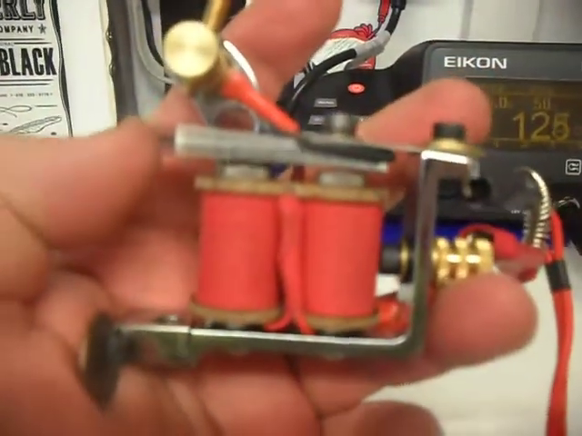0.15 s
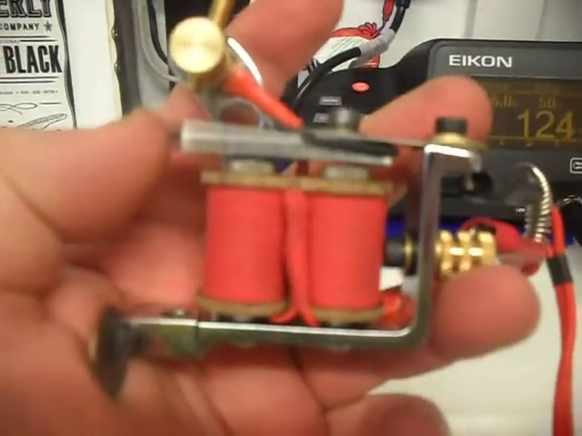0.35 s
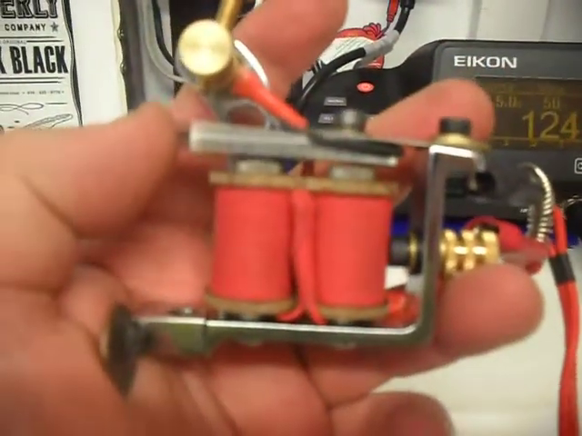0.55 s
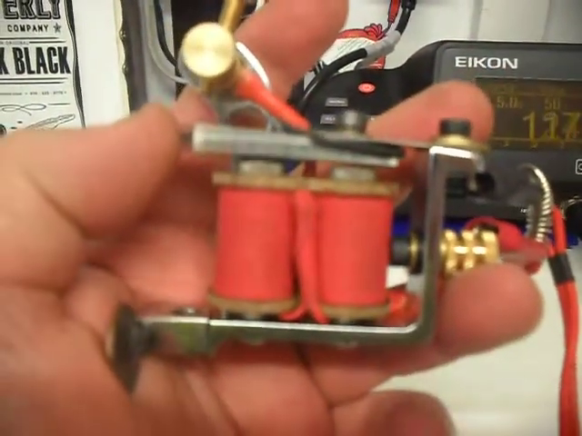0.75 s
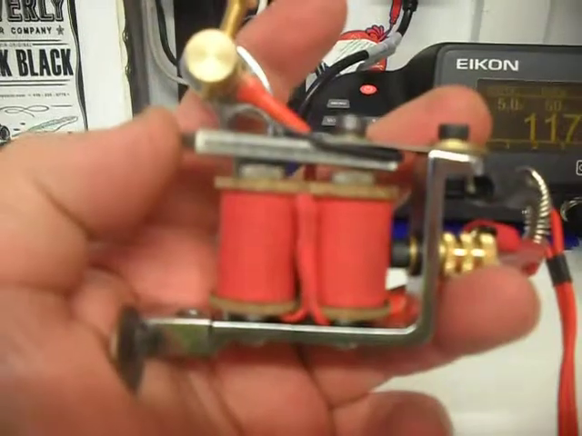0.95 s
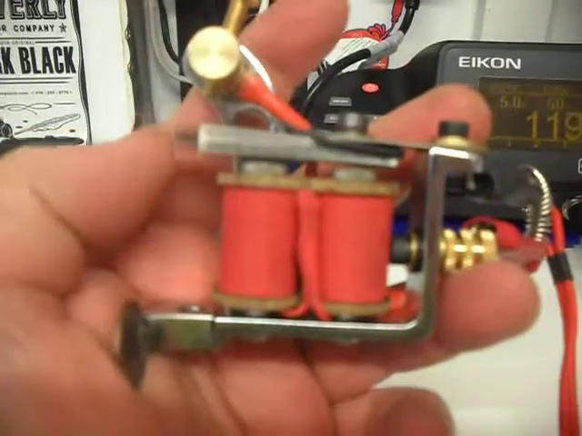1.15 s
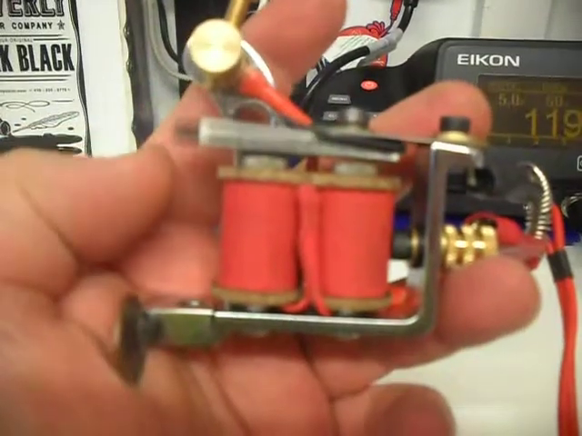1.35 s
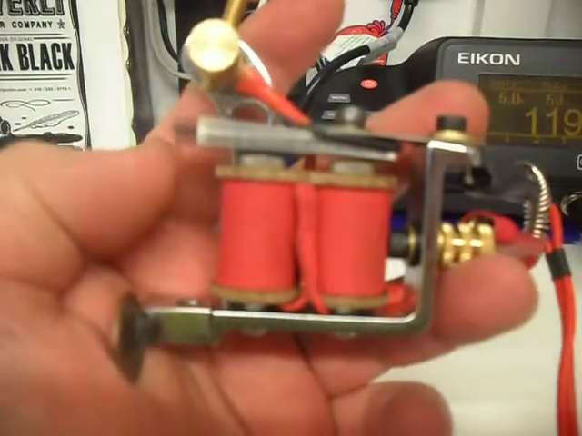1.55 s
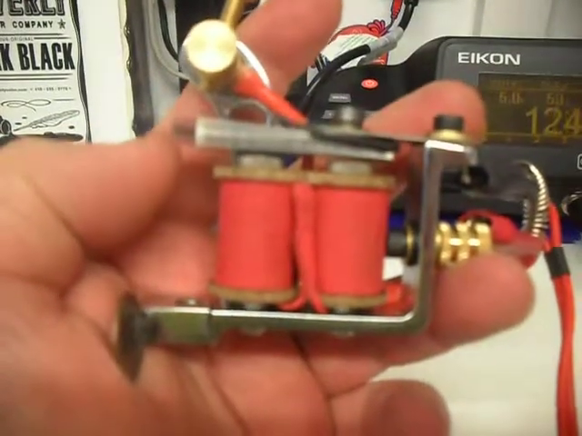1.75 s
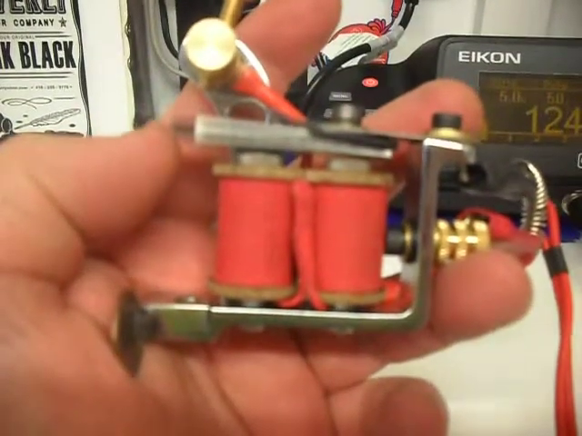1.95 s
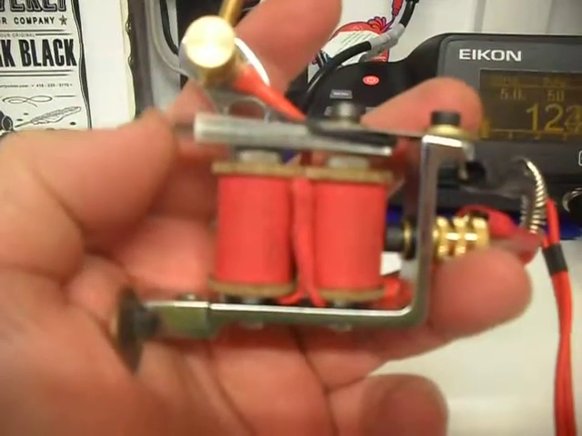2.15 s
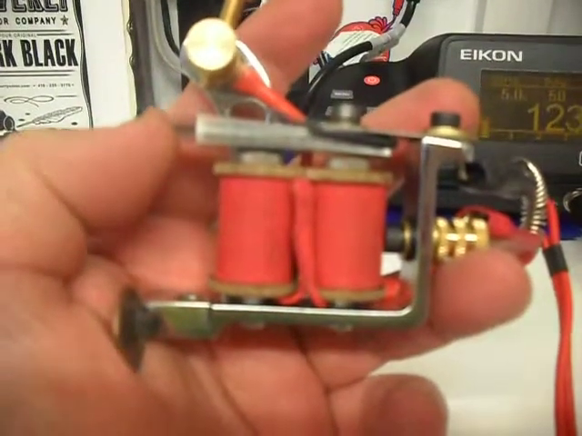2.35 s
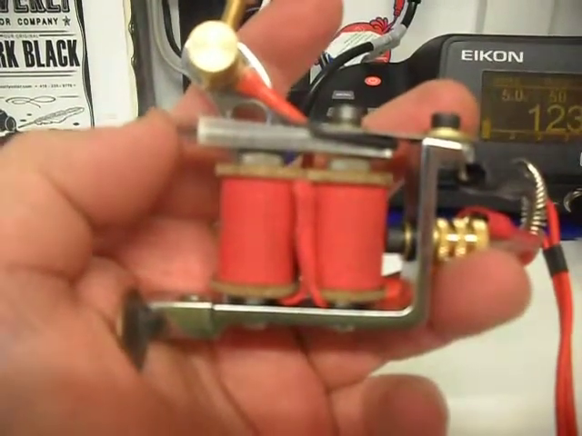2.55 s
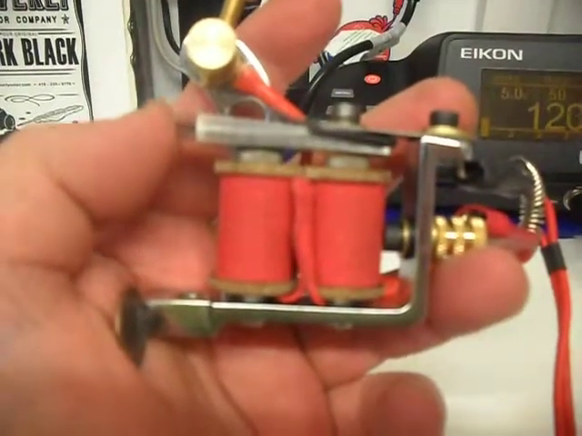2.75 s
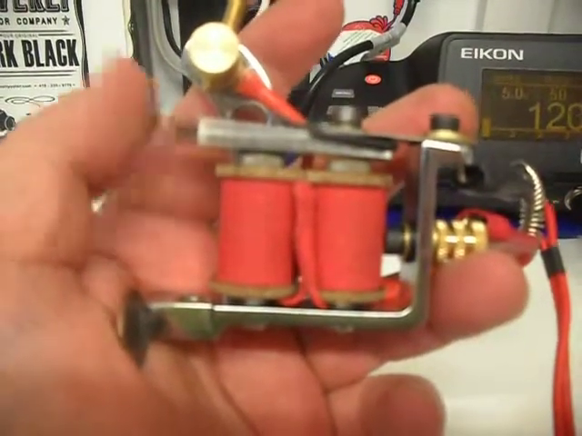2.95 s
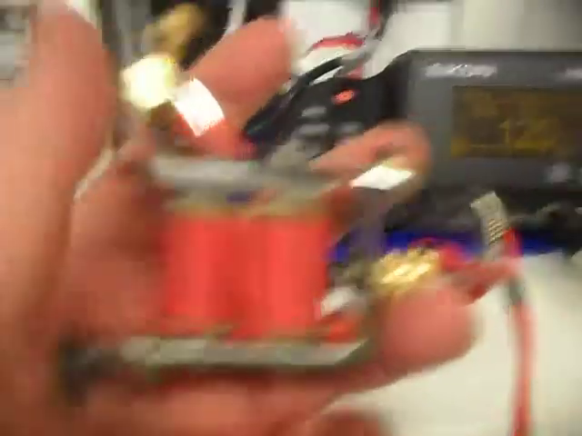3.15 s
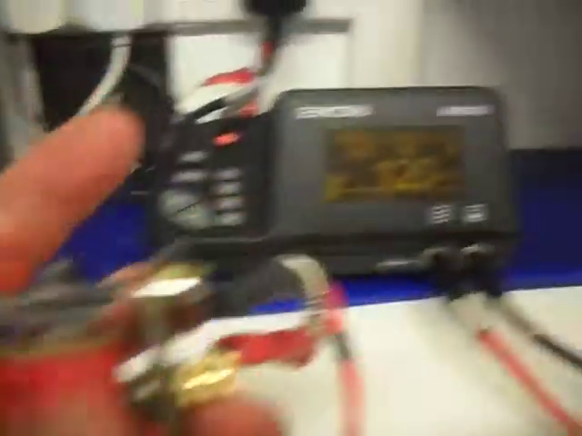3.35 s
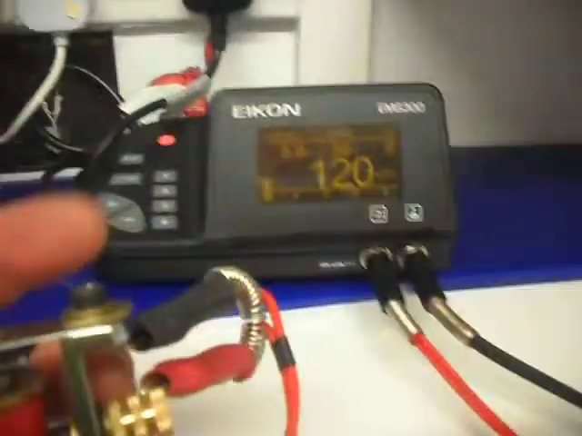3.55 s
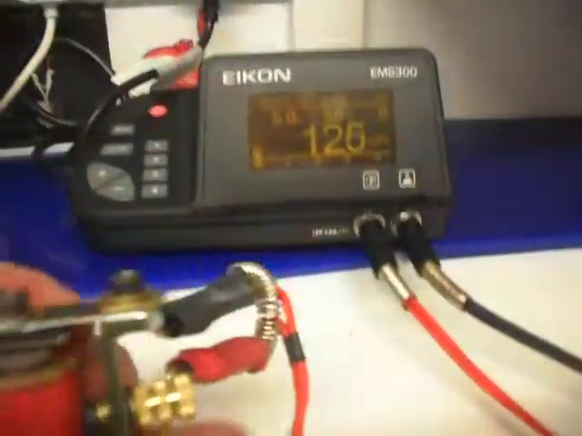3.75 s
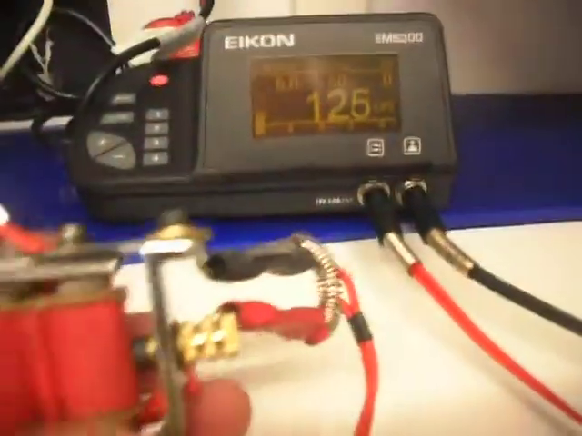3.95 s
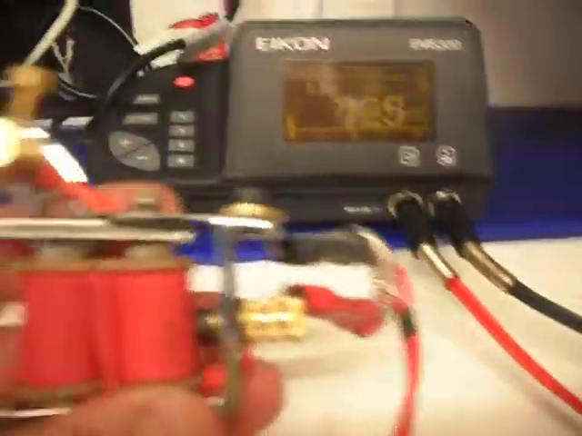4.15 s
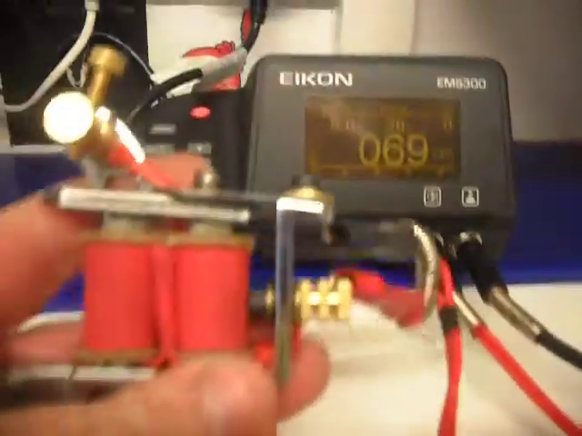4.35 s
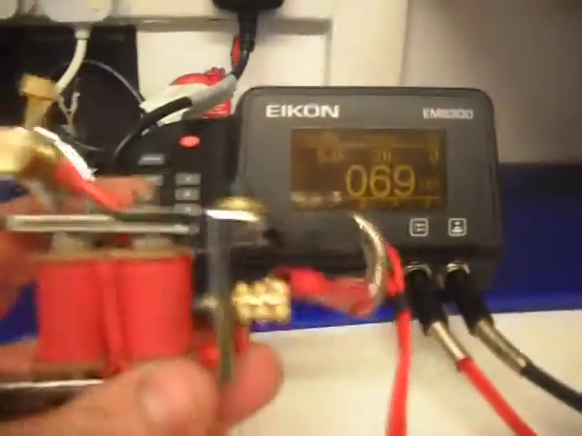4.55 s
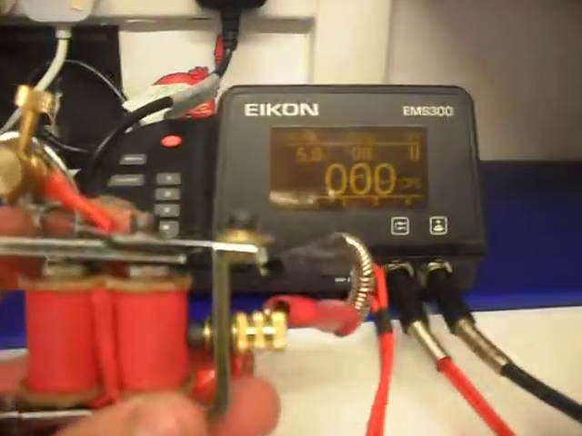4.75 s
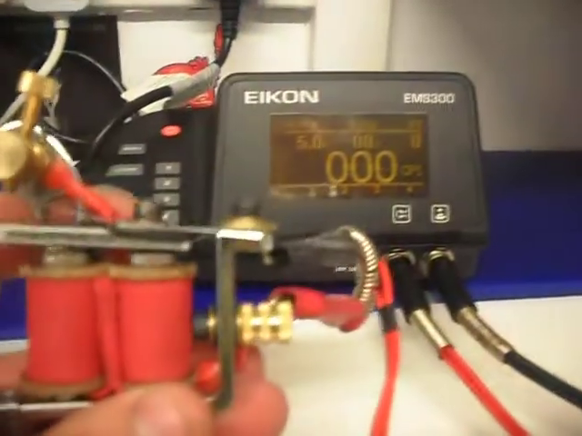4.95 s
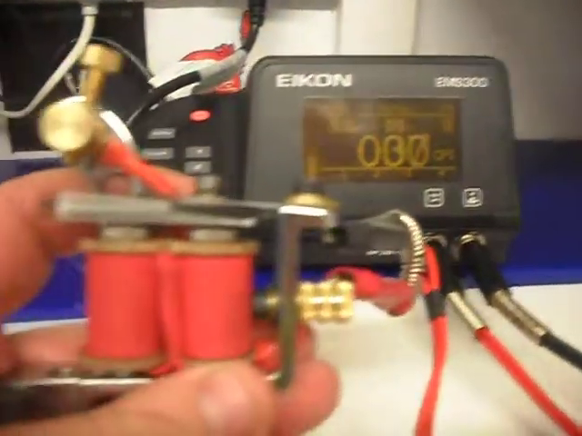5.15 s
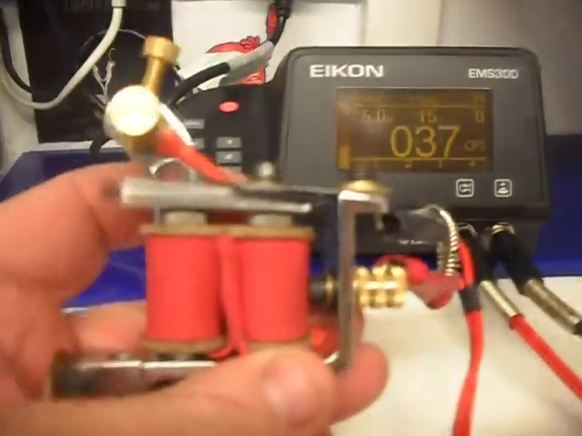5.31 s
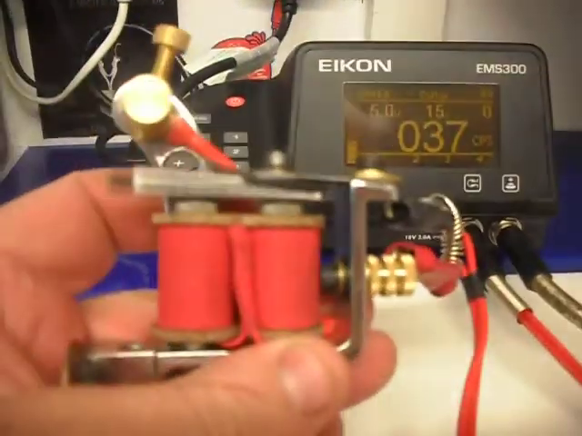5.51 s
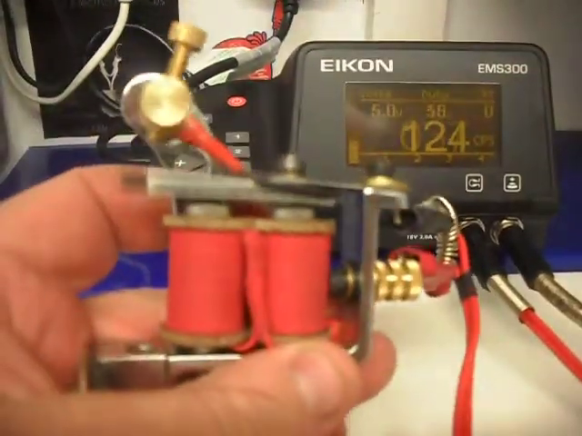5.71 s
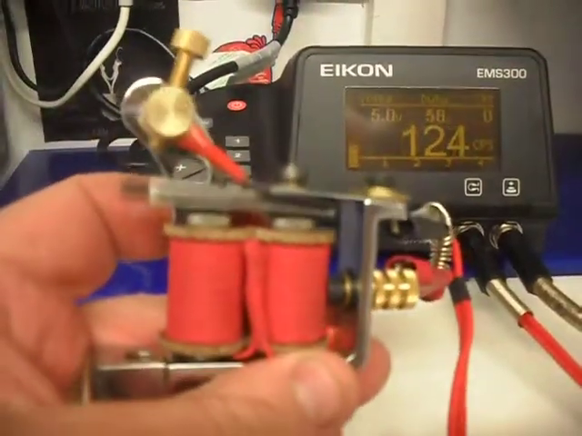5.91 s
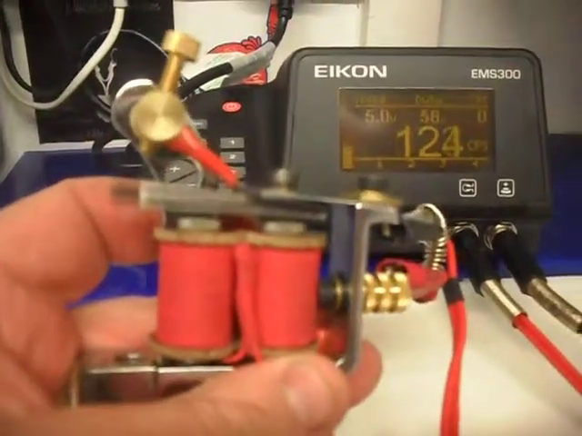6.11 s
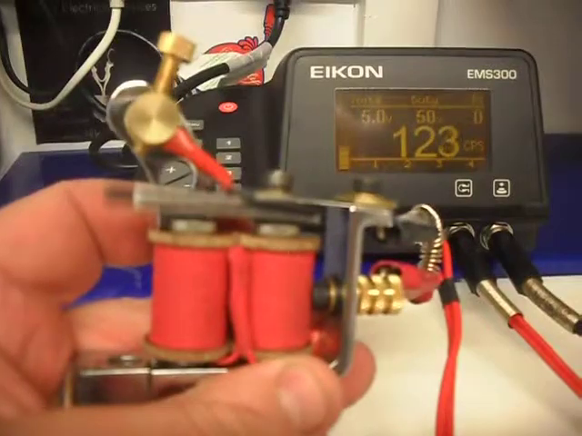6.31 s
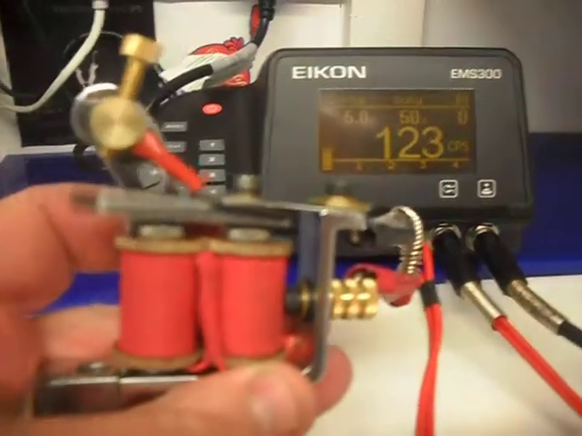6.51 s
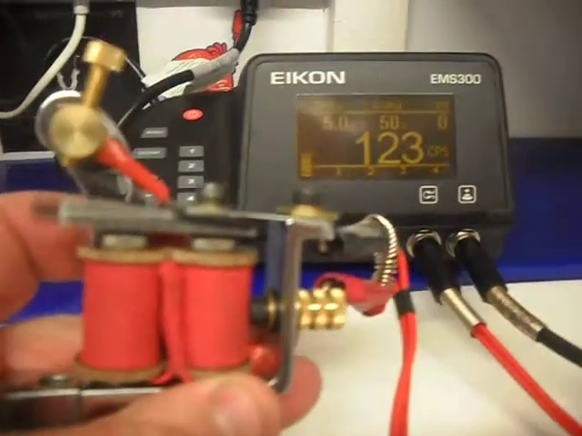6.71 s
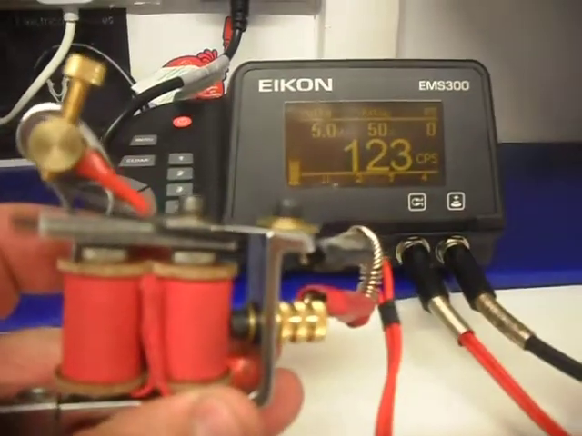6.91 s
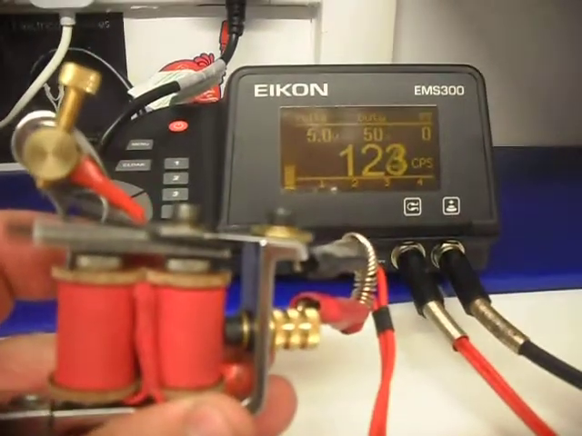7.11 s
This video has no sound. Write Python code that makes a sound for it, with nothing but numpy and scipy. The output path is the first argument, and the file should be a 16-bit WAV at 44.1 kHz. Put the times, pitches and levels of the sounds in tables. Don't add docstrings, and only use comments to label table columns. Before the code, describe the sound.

Close metallic buzzing from a tattoo-style coil machine, twice choked to faint contact ticking, silenced briefly amid dull handling knocks, then running again evenly.

```python
import sys
import numpy as np
from scipy import signal
from scipy.io import wavfile
from scipy.ndimage import uniform_filter1d

SR = 44100
rng = np.random.default_rng(int(sys.argv[2]) if len(sys.argv) > 2 else 0)


def ratio_of_db(decibels):
    return 10 ** (np.asarray(decibels, float) / 20)


def int16_out(signal):
    q = np.round(np.clip(np.atleast_2d(signal).T, -1, 1) * 32767)
    wavfile.write(sys.argv[1], SR, q.astype(np.int16))


N = 320607
T = np.arange(N) / SR

# time [s], position step,
# grip (0 fingers on the frame, 1 free, 2 seen from the top), nearness [dB].
POSE = [(0, 0.81, 0.44, 0.84), (1.05, 1.2, 0.08, 0.7), (1.1, 1.06, 0.58, -1.5), (1.3, 1.34, 0.83, -1),
        (1.6, 0.84, 0.67, -1.6), (2, 1.63, 0.37, -0.26), (2.8, 2.96, 0.27, 0.05), (2.95, 2.27, 0.48, -0.6),
        (3.15, 2.13, 0.29, -2.5), (3.35, 3.5, 0.17, -2.5), (3.5, 7.1, 0.15, -1.7), (3.6, 5.7, 0.15, -0.3),
        (3.87, 8.95, 0.097, -1.5), (4.97, 8.6, 1.4, -2), (5.4, 6.17, 1.56, -3.5), (5.65, 6.26, 1.46, -2.5),
        (6.35, 4.52, 1.365, -0.5), (7.27, 3.82, 1.45, -3)]
# time [s], strokes per second [Hz].
PACE = [
    [(0, 123), (.44, 117.5), (.534, 113), (.576, 115.7), (.622, 113), (.898, 122.6), (1.0, 123),
     (1.07, 118.4), (1.1, 123.1)],
    [(1.19, 124.85), (1.564, 124.8), (1.74, 123.5), (2.02, 121.2), (2.13, 121.8), (2.3, 121.5),
     (2.516, 119.7), (2.602, 117.8), (2.7, 113.9)],
    [(2.754, 114.1), (2.788, 118.5), (2.89, 121.1), (2.936, 124.5), (3.35, 125.25), (3.46, 125.15),
     (3.62, 123.8), (3.744, 123.1), (3.86, 125.4)],
    [(4.994, 122.5), (5.02, 124.5), (5.24, 124.1), (5.45, 124.7), (5.54, 124), (6.14, 123.6), (6.86, 123.4),
     (7.27, 123.7)],
]
STRIKES = [1.1, 4.9965]
CURRENT_OFF = [3.863, 4.994]
# level for grip 0, 1, 2 [dB], loss under the free pace [dB/Hz],
# further loss when faltering [dB/Hz].
PARTS = dict(ring=(-38, -35.5, -36, 1.18, 1), thud=(-52, -53, -40, 0.83, 1.3),
         treble=(-41.5, -41.5, -30, 1.11, 1.5), contact=(-45.5, -41.5, -43, 0.79, 3.5))
# start [s], end [s].
MISSES = [
    (.505, .552),
    (.612, 1.093),
    (2.685, 2.768),
]
# time [s], half length [s], screw [dB], spring [dB].
FLUTTERS = [
    (0.528, 0.046, -57.5, -54.5),
    (0.629, 0.042, -58, -54),
    (0.793, 0.065, -57, -62),
    (1.06, 0.037, -59.5, -60),
    (2.734, 0.089, -58.5, -57),
]
# frequency [Hz], width [Hz], level for grip 0, 1, 2 [dB].
FRAME_MODES = [(3713, 87, -6, 10.5, -4), (3846, 60, -24, 2.5, -3), (4380, 50, -47, -24, -24),
               (4600, 19, -25, -18, -24), (4715, 40, -26, -12, 2), (4768.5, 66, 0.5, 10, -9),
               (5005, 60, -8.5, -1, 11), (5600, 55, -18, -28, -14), (5406, 75, -5, 3, -15),
               (5720, 49, -15, -22, -27)]
# frequency [Hz], width [Hz], level for grip 0, 1, 2 [dB].
COIL_MODES = [(2320, 340, -13.5, -12.5, -16), (2530, 180, -17, -11.5, 9), (2979.5, 39.5, 3, 3, 2),
              (3070, 51, -5.5, -8, -11), (3400, 69, -17, 0, 13)]
# frequency [Hz], width [Hz], level from the side, from the top [dB].
BAR_MODES = [(5930, 380, -8, -24), (6590, 295, -2, 12), (6940, 210, -36, 18.5), (6640, 560, -33, -32.5),
             (7760, 220, -30, 21), (7920, 1130, -6, 6.5), (8900, 460, -28, -16.5), (9060, 123, 2, 14),
             (8800, 130, -10, -2), (9800, 120, -12, 0), (10670, 140, -7, -11), (9676, 120, -1.5, -6),
             (10120, 124, -1.5, -12), (11390, 47, -6.5, -18)]
# frequency [Hz], level from the side, from the top [dB].
THUD = [(200, -30, -67), (405, -35.5, -34.5), (503.5, 3.5, 14.5), (816, -7, -2.5), (882, 11.5, 17.5),
        (1220, 9.5, 1.5), (1555, 8, 21), (1834, 12, -3.5), (1930, 1.5, 17), (2324, 12, -32),
        (2835, -28.5, -34), (4000, -67.5, -62)]
# frequency [Hz], width [Hz], level [dB].
SPRING_MODES = [(2500, 380, -19.5), (2974, 60, -4.5), (3240, 70, -0.5), (3410, 164, -3.5)]
# frequency [Hz], width [Hz], level [dB].
SCREW_MODES = [(7620, 200, 0), (7850, 150, 0), (8300, 150, -1), (9200, 300, -5), (9690, 250, 0),
               (10300, 260, -3), (10650, 160, -1), (11400, 160, -6)]
# frequency [Hz], level [dB].
SNAP = [(600, -30), (1500, -10), (3800, -3), (5500, -2), (6300, -7), (6900, -20), (7600, -6), (10500, -4),
        (11600, -8), (13000, -20)]
# start [s], end [s], first order, third order [dB].
SQUEEZES = [(0.312, 0.785, -73, -72.5), (0.803, 1.147, -74.5, -103), (1.933, 2.066, -74, -99),
            (2.557, 2.85, -74, -74), (3.138, 3.38, -70, -71.5), (3.54, 3.88, -81, -81),
            (5.027, 5.16, -73, -74), (5.65, 7.3, -69, -97.5)]
# frequency [Hz], density [dB per Hz].
FLOOR = [(8.8, -33), (15, 4), (46, -9.5), (120, -22), (154, -17.5), (178, -22.5), (312, -23), (489, -26),
         (788, -27), (1140, -28), (1940, -31.5), (2290, -32.5), (9880, -37), (12400, -63), (16100, -99),
         (22000, -120)]
# frequency [Hz], width [Hz], level [dB].
ROOM_HUM = [(101.6, 1.5, -76), (146.3, 5.5, -82.5)]
# start [s], end [s], level [dB], low edge [Hz], high edge [Hz].
RUBS = [(3.164, 3.302, -58.5, 650, 1500), (3.174, 3.35, -80, 200, 650), (3.852, 3.915, -55, 1780, 4140),
        (4.187, 4.263, -72, 500, 1400), (4.75, 4.82, -74, 700, 2500), (4.941, 4.998, -62, 900, 3840),
        (4.762, 4.778, -69, 1500, 4000)]
# time [s], peak [dB], frequency [Hz], t60 [s].
KNOCKS = [(3.186, -45.5, 1110, 0.085), (3.201, -44, 284, 0.051), (3.224, -53, 1156, 0.098),
          (3.25, -64, 965, 0.07), (3.286, -57, 780, 0.31), (3.9, -48.5, 245, 0.065),
          (4.197, -47.5, 1030, 0.045), (4.202, -52, 313, 0.05), (4.245, -60, 247, 0.052),
          (4.495, -49, 233, 0.066), (4.5, -56, 605, 0.065), (4.755, -57, 910, 0.07), (4.775, -61, 1160, .1),
          (4.768, -63, 3350, .04), (4.947, -46.5, 1370, 0.045)]
# time [s], level [dB].
LOOSE_TICKS = [(3.874, -55), (3.88, -51), (3.89, -53), (3.9, -52), (3.916, -59), (3.925, -60),
               (4.9635, -61), (4.9728, -54), (4.981, -56), (4.99, -53)]
# frequency [Hz], t60 [s].
ROOM = [(500, 0.3), (2000, 0.32), (5000, 0.28), (11000, 0.029)]

FREE_HZ, FALTER_HZ = 123.16, 118.6
MISS_EDGE_S, MISS_DB = 0.011, -50
HELD_THUD_DB = -12.5
REST_SCREW_DB, REST_SPRING_DB = -65, -64
CONTACT_TOP_DB, SCREW_TOP_DB = -52, -54
FRAME_LAG_S = 0.0005
BOUNCE_S, BOUNCE_DB, BOUNCE_SHIFT = 0.00155, -6, 0.008
SQUEEZE_EDGE_S, LOOSE_HUM_DB, LOOSE_THIRD_DB = 0.11, -73, -81.5
FLOOR_DB = -60.5


def evened(x):
    return x / np.sqrt(np.mean(x ** 2) + 1e-20)


def read(points, hz):
    f, value = np.transpose(points)
    return np.interp(np.log(hz + 1), np.log(f + 1), value)


def column(tables, index):
    rows = np.vstack(tables)
    return np.interp(T, rows[:, 0], rows[:, index])


def span(t, start, end, edge_s):
    return np.clip(np.minimum(t - start, end - t) / edge_s + 0.5, 0, 1)


def over(db, top_db):
    under = ratio_of_db(np.minimum(db, top_db))
    return under, np.sqrt(ratio_of_db(db) ** 2 - under ** 2)


def unit(response):
    return response / np.linalg.norm(response) * np.sqrt(SR / 124)


def struck(gain):
    log_gain = np.log(gain / gain.max() + 1e-5)
    response = np.fft.ifft(np.exp(np.conj(signal.hilbert(log_gain)))).real
    return unit(response[:len(gain) // 2])


def ring(modes, size=8192):
    f = abs(np.fft.fftfreq(size, 1 / SR)) + 1
    power = sum(ratio_of_db(2 * db) / (1 + (2 * (f - hz) / width) ** 2) for hz, width, db in modes)
    low_skirt = 1 + (0.93 * modes[0][0] / f) ** 16
    high_skirt = 1 + (f / modes[-1][0] / 1.07) ** 16
    return struck(np.sqrt(power / (low_skirt * high_skirt)))


def click(points, size=8192):
    return struck(ratio_of_db(read(points, abs(np.fft.fftfreq(size, 1 / SR)))))


def impulses(s, size):
    at = (s * SR).astype(int)[:, None] + np.arange(-15, 17)
    off = at - s[:, None] * SR
    pulse = np.sinc(off) * np.cos(np.pi * off / 34) ** 2
    out = np.zeros(N + 64)
    np.add.at(out, np.clip(at, 0, N + 63), pulse * size[:, None])
    return out[:N]


def played(s, size, response):
    return signal.oaconvolve(impulses(s, size), response)[:N]


def powered(t):
    return (t < CURRENT_OFF[0]) | (t > CURRENT_OFF[1])


def bar_turns():
    turns = np.cumsum(column(PACE, index=1)) / SR
    shift = np.unwrap(-np.interp(STRIKES, T, turns) % 1, period=1)
    return turns + np.interp(T, CURRENT_OFF, shift)


def strengths(s):
    hz = np.interp(s, T, column(PACE, index=1))
    grip = np.interp(s, T, column([POSE], index=2))
    near_db = np.interp(s, T, column([POSE], index=3))
    missed_db = MISS_DB * sum(span(s, start, end, MISS_EDGE_S) for start, end in MISSES)
    slow_hz, falter_hz = FREE_HZ - hz, np.maximum(FALTER_HZ - hz, 0)
    ring_db, thud_db, treble_db, contact_db = (
        np.interp(grip, range(3), part[:3]) + near_db + missed_db - part[3] * slow_hz - part[4] * falter_hz
        for part in PARTS.values())
    screw, spring = ratio_of_db(REST_SCREW_DB), ratio_of_db(REST_SPRING_DB)
    for at, half, flutter_screw_db, flutter_spring_db in FLUTTERS:
        bump = np.exp(-((s - at) / half) ** 2)
        screw = screw + bump * ratio_of_db(flutter_screw_db)
        spring = spring + bump * ratio_of_db(flutter_spring_db)
    screw_db, spring_db = 20 * np.log10(screw), 20 * np.log10(spring)
    thud_db = np.maximum(thud_db, screw_db + HELD_THUD_DB)
    return ring_db, thud_db, np.maximum(treble_db, screw_db), np.maximum(contact_db, spring_db)


def core_blows(s, weak, frame, coil, tick, thud):
    blow_s = s + (1.5e-6 + 12e-6 * weak) * rng.standard_normal(len(s))
    blow = powered(s) * ratio_of_db((0.06 + 0.5 * weak) * rng.standard_normal(len(s)))
    grip = np.clip(np.interp(s, T, column([POSE], index=2)), 0, 2)
    bounce_s = BOUNCE_S * (1 + BOUNCE_SHIFT * np.interp(s, T, column([POSE], index=1)))
    taps = [(0, 0), (bounce_s, BOUNCE_DB), (2.37 * bounce_s, 2.7 * BOUNCE_DB)]
    out = 0
    for k in range(3):
        hit = blow * np.maximum(1 - abs(grip - k), 0)
        side = 1 + k // 2
        frame_ring = ring([(m[0], m[1], m[2 + k]) for m in FRAME_MODES])
        coil_ring = ring([(m[0], m[1], m[2 + k]) for m in COIL_MODES])
        bar_ring = ring([(m[0], m[1], m[1 + side]) for m in BAR_MODES])
        out += played(blow_s + FRAME_LAG_S, hit * frame * ratio_of_db(0.55), frame_ring)
        out += played(blow_s, hit * coil * ratio_of_db(1.0), coil_ring)
        for lag_s, db in taps:
            out += played(blow_s + lag_s, hit * tick * ratio_of_db(db - 2.3), bar_ring)
        out += played(blow_s, hit * thud * ratio_of_db(1.74), click([(m[0], m[side]) for m in THUD]))
    return out


def contact_ticks(s, weak, spring, screw):
    touch_s = s + 0.0036 + (3e-6 + 9e-6 * weak) * rng.standard_normal(len(s))
    touch = powered(s) * ratio_of_db(0.7 * weak * rng.standard_normal(len(s)))
    out = played(touch_s, touch * spring, ring(SPRING_MODES))
    out += played(touch_s, touch * screw * ratio_of_db(-3), ring(SCREW_MODES) + 0.7 * click(SNAP))
    return out + played(touch_s + 0.0031, touch * screw * ratio_of_db(-6), ring(SCREW_MODES))


def machine(turns):
    s = np.interp(np.arange(0, int(turns[-1])), turns, T)
    ring_db, thud_db, treble_db, contact_db = strengths(s)
    weak = np.clip((-39 - ring_db) / 15, 0, 1)
    reach = np.clip((ring_db + 62) / 6, 0, 1)
    screw, tick = over(treble_db, SCREW_TOP_DB - 6 * reach)
    spring, coil = over(contact_db, CONTACT_TOP_DB)
    blows = core_blows(s, weak, reach * ratio_of_db(ring_db), reach * coil, reach * tick, ratio_of_db(thud_db))
    missed = 1 - reach
    return blows + contact_ticks(s, weak, spring + missed * coil, screw + missed * tick)


def squeezed(loose_db, index):
    grips = (ratio_of_db(row[index]) * span(T, row[0], row[1], SQUEEZE_EDGE_S) for row in SQUEEZES)
    return ratio_of_db(loose_db) + sum(grips)


def coil_hum(turns):
    phase = 2 * np.pi * turns
    hum = squeezed(LOOSE_HUM_DB, index=2) * (np.sin(phase) + 0.35 * np.sin(2 * phase))
    hum += squeezed(LOOSE_THIRD_DB, index=3) * np.sin(3 * phase)
    return np.sqrt(2) * uniform_filter1d(1.0 * powered(T), size=600) * hum


def floor():
    frames, hz = N // 512 + 5, np.fft.rfftfreq(2048, 1 / SR)
    a, b = rng.standard_normal((frames, 1025, 2)).T
    lumps = evened(uniform_filter1d(rng.standard_normal(frames), size=9))
    db = read(FLOOR, hz)[:, None] + 0.55 * lumps * np.exp(-hz / 250)[:, None]
    hiss = signal.istft((a + 1j * b) * ratio_of_db(db), nperseg=2048, noverlap=1536)[1][:N]
    out = ratio_of_db(FLOOR_DB) * evened(hiss)
    for mode in ROOM_HUM:
        hum = signal.oaconvolve(rng.standard_normal(N), ring([mode], size=32768))[:N]
        out += ratio_of_db(mode[2]) * evened(hum)
    return out


def rubs():
    out = np.zeros(N)
    for s, end, db, low_hz, high_hz in RUBS:
        grains = rng.standard_normal((2, SR // 4))[:, :round((end - s) * SR)]
        clumps = ratio_of_db(1.2 * evened(uniform_filter1d(grains[0], size=300)))
        band = signal.butter(2, [low_hz, high_hz], "band", fs=SR, output="sos")
        rub = evened(signal.sosfilt(band, clumps * grains[1]))
        out[round(s * SR):][:len(rub)] += ratio_of_db(db) * rub * signal.windows.tukey(len(rub), 0.6)
    return out


def knocks():
    out, t = np.zeros(N), np.arange(6000) / SR
    for s, db, hz, t60 in KNOCKS:
        fuzz = evened(signal.lfilter([1], [1, -0.95], rng.standard_normal(len(t))))
        tap = (0.75 + 0.46 * fuzz) * np.sin(2 * np.pi * hz * t)
        tap += 0.08 * rng.standard_normal(len(t)) * np.exp(-t / 0.0034)
        out[round(s * SR):][:len(t)] += ratio_of_db(db - 60 * t / t60) * tap * np.minimum(t / 0.0019, 1)
    return out


def loose_ticks():
    s, db = np.transpose(LOOSE_TICKS)
    return played(s, ratio_of_db(db), ring(SPRING_MODES) + 0.7 * ring(SCREW_MODES) + 0.2 * click(SNAP))


def tail(start, size, t60_scale):
    taps = np.zeros(size)
    at = np.arange(start, size - 20, 20)
    taps[at + rng.integers(0, 20, len(at))] = rng.choice([-1.0, 1.0], len(at))
    hz, t, z = signal.stft(taps, SR, nperseg=128)
    decay = ratio_of_db(-60 * t / (t60_scale * read(ROOM, hz)[:, None]))
    out = signal.istft(z * decay, SR, nperseg=128)[1]
    return out / np.linalg.norm(out)


def space(x, near_db, far_db, count=10):
    step = column([POSE], index=1)
    near = 0
    for k in range(count):
        share = np.cos(np.pi / 2 * np.clip(step - k, -1, 1))
        near += signal.oaconvolve(x * share, tail(start=30, size=2000, t60_scale=0.25))[:N]
    near = signal.lfilter(*signal.butter(2, 800, "high", fs=SR), near)
    near = 0.65 * near + 1.5 * signal.lfilter(*signal.butter(2, 6000, "high", fs=SR), near)
    far = signal.oaconvolve(x, tail(start=300, size=12000, t60_scale=0.68))[:N]
    mix = x + ratio_of_db(near_db) * near + ratio_of_db(far_db) * far
    return mix / np.sqrt(1 + ratio_of_db(2 * near_db) + ratio_of_db(2 * far_db))


def scene():
    turns = bar_turns()
    close = machine(turns) + rubs() + knocks() + loose_ticks()
    heard = space(close, near_db=-5.5, far_db=-13)
    return (heard + coil_hum(turns) + floor())[None]


def low_pass(x):
    return signal.sosfilt(signal.butter(12, 12520, fs=SR, output="sos"), x)


def record(dry):
    edge_hz, edge_db = [0, 10500, 11800, 12600, SR / 2], np.array([0, -0.3, -5, -20, -80])
    edge = signal.firwin2(257, edge_hz, ratio_of_db(edge_db), fs=SR)
    return low_pass(signal.oaconvolve(dry, edge[None], "same"))


dry = scene()
out = record(dry)
int16_out(out)
```